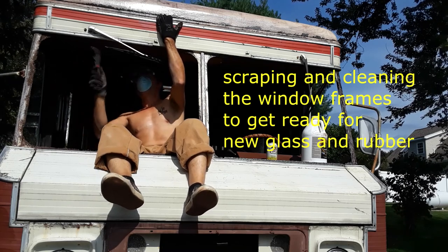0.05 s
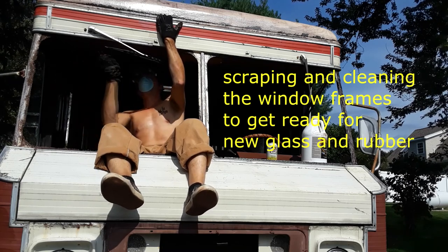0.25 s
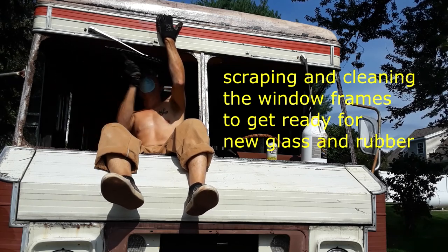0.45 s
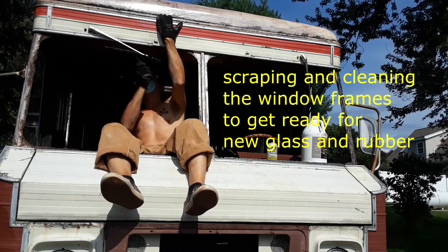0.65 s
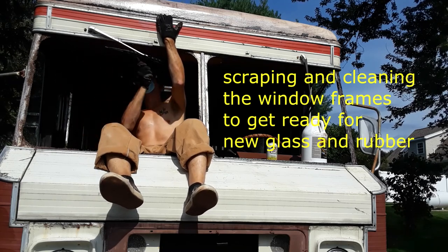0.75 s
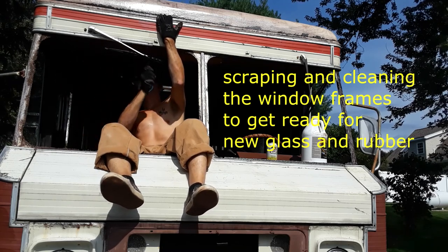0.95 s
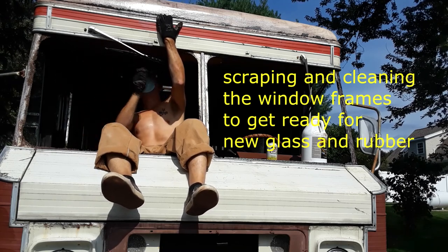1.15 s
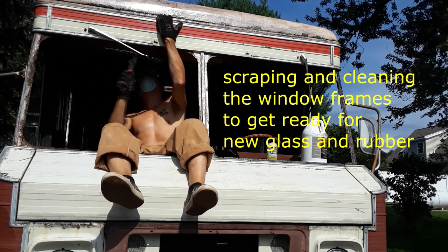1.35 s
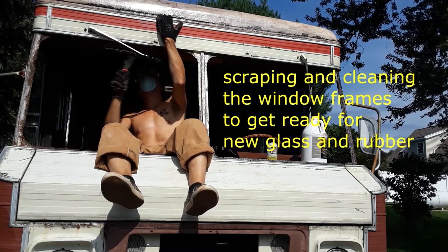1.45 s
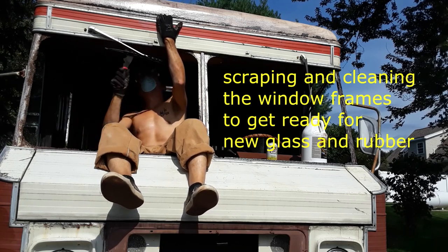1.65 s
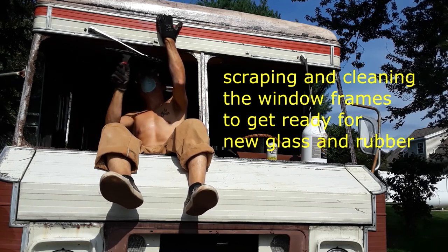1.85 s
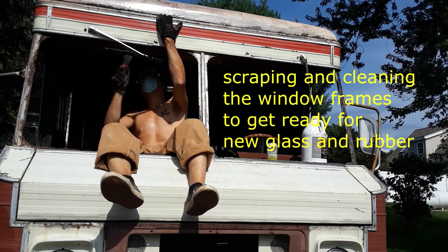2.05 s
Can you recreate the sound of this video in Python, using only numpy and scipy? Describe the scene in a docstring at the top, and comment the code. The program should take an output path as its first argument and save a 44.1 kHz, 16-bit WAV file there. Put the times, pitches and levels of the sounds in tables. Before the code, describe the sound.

Rough metal scraping comes in three short bursts as a blade catches on a camper window frame. After a pause, one knock rings the panels. The microphone is a few metres away outdoors, with faint hum and breeze.

```python
"""A steel scraper is pushed three times along an old camper's window frame, then knocks against it once.
The blade sticks, slips and judders, catching on old sealant. These tiny jolts make the blade hiss,
the frame rattle and the sheet panels boom into the cab. We hear it outdoors, a few metres away and
a little to the left, over a faint low hum, a hiss and a light breeze."""
import sys
import numpy as np
from scipy import signal
from scipy.fft import rfft, irfft
from scipy.io import wavfile

SR = 44100
rng = np.random.default_rng(int(sys.argv[2]) if len(sys.argv) > 2 else 0)


def wav_record(signal):
    """Record a signal, one row per channel, as 16-bit PCM in the file named by sys.argv[1]."""
    frames = np.transpose(np.atleast_2d(signal))
    bounded = np.clip(frames, -1, 1)
    # unit amplitude maps onto the largest positive 16-bit level
    quanta = np.round(bounded * 32767).astype(np.int16)
    wavfile.write(sys.argv[1], SR, quanta)


N = 92610
T = np.arange(N) / SR
FREQS = np.maximum(np.fft.rfftfreq(2 * N, 1 / SR), 1)

# tone of the outdoor air and of the breeze on the microphones: (frequency [Hz], level [dB])
AIR_TONE = [(20, -2), (45, -67), (65, -19), (100, -9.5), (160, -5.5), (230, -9.5), (330, -15), (500, -17.5),
            (1400, -22), (4000, -24), (8200, -24.5), (9400, -32.5), (16000, -31)]
BREEZE_TONE = [(20, -49), (45, -22), (68, 12), (100, -12), (160, -12), (400, -6), (2000, -65)]
# how loud the far hum is: (time [s], level [dB])
HUM_LEVEL = [(0, -53.5), (.2, -55), (.7, -47.5), (1.15, -50), (1.33, -59), (1.48, -53), (1.65, -46.5),
             (1.9, -56), (2.1, -59)]
# how hard each part is pushed, one list per stroke: (time [s], panels [dB], frame [dB], blade [dB])
STROKES = [
    [(.230, -22, -40, -27), (.255, -30, -23, -53), (.275, -24, -25.5, -30), (.31, -28, -23.5, -28),
     (.335, -17.5, -15.5, -23), (.352, -28, -17, -27), (.368, -39, -16, -16), (.392, -21, -17.5, -22.5),
     (.405, -29.5, -28.5, -54), (.435, -27, -21, -32), (.465, -58, -51, -36.5), (.49, -53, -46, -38)],
    [(.495, -31, -19, -20), (.515, -33, -27, -30), (.535, -39, -24.5, -35), (.555, -47, -28, -34),
     (.567, -28.5, -24.5, -39), (.595, -28, -30.5, -32), (.612, -31, -23.5, -32.5), (.628, -34, -38, -59)],
    [(.74, -61, -47, -57), (.775, -54, -50.5, -57), (.835, -68, -49, -64), (.857, -34, -29, -39),
     (.863, -29, -21, -24.5), (.873, -30.5, -33, -42), (.895, -28, -20.5, -24.5), (.912, -27.5, -22.5, -25),
     (.935, -27.5, -27.5, -28), (.952, -27, -33, -35.5), (.98, -36, -53, -45)],
]
# the blade catches and snaps free: (time [s], panels [dB], frame [dB], blade [dB])
CATCHES = [(.2298, -18.5, -17.5, -18), (.2655, -41, -30, -40), (.326, -24, -20, -24.5),
           (.3655, -15.5, -18, -18.5), (.3865, -41, -20, -18), (.3935, -41, -13.5, -27),
           (.4170, -24, -18.5, -15.5), (.4235, -29, -16.5, -19), (.4490, -26, -19, -17),
           (.4962, -30, -18, -24), (.5098, -38, -41, -16.5), (.529, -49, -22.5, -22),
           (.585, -43, -15, -28.5), (.8423, -26, -27, -21), (.8781, -22, -12.5, -11),
           (.9125, -20, -20.5, -28)]
# notes the panels and frame ring at: (frequency [Hz], ring time [s], scraped [dB], knocked [dB])
PANEL_NOTES = [(165.6, 0.38, -20.5, -17), (214.3, 0.29, -19.5, -20.5), (252.3, 0.28, -17.5, -40),
               (311.4, 0.58, -20, -34), (353.7, 0.49, -17.5, -27), (411.6, 0.2, -10.5, -10),
               (502, 0.31, -18.5, -17.5), (524.5, 0.26, -21, -15.5), (586, 0.29, -36, -21)]
FRAME_NOTES = [(704, 0.2, -20.5, -13), (813, 0.05, -22.5, -11), (872.5, 0.21, -19.5, -30),
               (979.6, 0.1, -16.5, -8), (1037, 0.072, -14, -43), (1163, 0.083, -15.5, -27.5),
               (1343, 0.081, -19, -20.5), (1673, .14, -20.5, -38), (1910, 0.05, -16, -25),
               (2108, 0.055, -18, -12)]
# notes the blade rings at: (frequency [Hz], ring time [s], level [dB])
BLADE_NOTES = [(10400, 0.014, -29.5), (12800, 0.0078, -14)]
# overall tone of each part and of the knock's thud: (frequency [Hz], level [dB])
PANEL_TONE = [(40, -42), (100, -14), (170, -1), (260, -1.5), (420, 3), (520, -3), (640, -8.5), (850, -16),
              (2000, -44), (16000, -70)]
FRAME_TONE = [(100, -37), (450, -11.5), (720, -5), (1050, 0), (1650, -1.5), (2100, -7), (2900, -10.5),
              (4000, -22.5), (6000, -22.5), (16000, -47.5)]
BLADE_TONE = [(100, -39), (1500, 2.5), (3000, 3.5), (4300, -0.5), (5500, -0.5), (7000, -2), (9000, -3.5),
              (11000, -3.5), (12700, 1.5), (14300, -7), (16000, -2.5)]
THUD_TONE = [(30, -53), (90, -23), (130, -24), (175, -13.5), (260, -2), (480, 4.5), (1150, -3), (1400, 0.5),
             (1800, -9), (2120, -6.5), (2450, -18.5), (3100, -15), (6000, -26), (16000, -41)]
# bursts of almost even slipping: (middle time [s], length [s], slip rate [1/s], level [dB])
JUDDERS = [(0.275, 0.031, 1060, -27), (.314, 0.026, 1070, -23), (.338, .025, 1680, -15.5),
           (.385, .035, 1700, -19), (.452, 0.0097, 2700, -17.5), (.570, .03, 980, -27),
           (.625, .05, 515, -37.5), (0.8444, .005, 2060, -16)]
# notes left ringing as the last stroke flicks free: (frequency [Hz], ring time [s], level [dB])
FLICK_NOTES = [(410, .28, -15.5), (445, .2, -26), (1034, .18, -31), (2778, .25, -37), (5577, .6, -30),
               (12550, .2, -33)]
# the blade touches, lands on the frame and settles: (time [s], thud [dB], blade [dB])
KNOCKS = [(1.7470, -28, -19.5), (1.7495, -47, -20.5), (1.7513, -6.5, -22), (1.7548, -13.5, -26),
          (1.849, -35.5, -42)]
# how much louder the left microphone is than the shaded right one: (frequency [Hz], level [dB])
LEFT_LEAD = [(100, -2.5), (600, 1), (1150, -2.5), (2000, -2.5), (4500, 1.5), (6800, -5), (8000, 1.5),
             (9500, 7.5), (12800, 11), (14000, 5), (16000, -7)]


def undb(db):
    """Turn decibels into a number to multiply by."""
    return 10 ** (np.asarray(db) / 20)


def unit(x):
    """Scale a sound so that its channels have an average energy of one."""
    return x / np.sqrt(np.mean(np.sum(x ** 2, axis=-1)))


def db_at(points):
    """Join (frequency [Hz], level [dB]) points into a curve over all frequencies."""
    hz, db = np.array(points, float).T
    return np.interp(np.log(FREQS), np.log(hz), db)


def filtered(x, gain):
    """Turn each frequency up or down by its own gain."""
    return irfft(rfft(x, 2 * N) * gain)[..., :N]


def with_tone(x, points):
    """Give a sound a tone curve, using a filter that never rings ahead of the sound."""
    cepstrum = irfft(np.log(undb(db_at(points))))
    one_sided = np.r_[cepstrum[0], 2 * cepstrum[1:N]]
    return filtered(x, np.exp(rfft(one_sided, 2 * N)))


def fade(ring_s):
    """A dying ring: 60 dB quieter after its ring time, ring_s."""
    return np.exp(-np.log(1000) * T / max(ring_s, 1 / SR))


def taps(table, column):
    """One sharp tap per row, with the energy of 4 ms of sound at that row's level."""
    out = np.zeros(N)
    for row in table:
        out[int(row[0] * SR)] += undb(row[column]) * np.sqrt(.004 * SR)
    return out


def two_mics(pair, alike_hz):
    """Mix two unrelated sounds for two microphones: alike in the bass, unrelated in the treble."""
    alike = 1 / (1 + (FREQS / alike_hz) ** 2)
    mid, side = filtered(pair, np.sqrt([(1 + alike) / 2, (1 - alike) / 2]))
    return np.array([mid + side, mid - side])


def ring_notes(force, notes, knocked=False):
    """A pushed part rings at its own notes, each dying away at its own speed."""
    response = np.zeros(N)
    for k, row in enumerate(notes):
        hz, ring_s, db = row[0], row[1], row[-1] if knocked else row[2]
        note = unit(fade(ring_s) * np.cos(2 * np.pi * hz * T))
        response += (-1) ** k * undb(db) * note
    return filtered(force, rfft(response, 2 * N))


def clatter(force, tone, ring_s, cab_ring_s, direct_db, cab_db):
    """A direct crack, a short noisy ring and the cab's echo; the ring changes as the blade travels."""
    spot_samples, ring_samples = 1764, 16384  # the blade spends 40 ms on each spot
    decay = np.hypot(unit(fade(ring_s)), undb(cab_db) * unit(fade(cab_ring_s)))[:ring_samples]
    ring = np.zeros((2, N + spot_samples + ring_samples))
    for start in range(0, N, spot_samples):
        push = force[None, start:start + spot_samples]
        noise = rng.standard_normal((2, ring_samples))
        if push.any():
            spot_ring = signal.fftconvolve(push, noise * decay, axes=1)
            ring[:, start:start + spot_ring.shape[1]] += spot_ring
    total = undb(direct_db) * force + two_mics(ring[:, :N], alike_hz=1490)
    total /= np.sqrt(1 + undb(direct_db) ** 2 + undb(cab_db) ** 2)
    tone_response = unit(with_tone(T == 0, tone))
    return filtered(total, rfft(tone_response, 2 * N))


def background(air_db=-45.5, breeze_db=-55.5, hum_hz=127.4, waver_hz=4.9):
    """Steady outdoor rumble and hiss, a breeze on the microphones and a hum like a far engine."""
    air_noise = two_mics(rng.standard_normal((2, N)), alike_hz=417)
    air = unit(with_tone(air_noise, AIR_TONE))
    breeze = unit(with_tone(rng.standard_normal((2, N)), BREEZE_TONE))
    slow_only = 1 / (1 + (FREQS / 6) ** 4)
    waver = np.sqrt(N) * unit(filtered(rng.standard_normal(N), slow_only))
    hum = unit(np.sin(2 * np.pi * np.cumsum(hum_hz + waver_hz * waver) / SR))
    hum_db = np.interp(T, *np.array(HUM_LEVEL).T)
    return np.sqrt(N) * (undb(air_db) * air + undb(breeze_db) * breeze + undb(hum_db) * hum)


def stick_slip(slips_per_s=650, gap_spread=.6, size_spread_db=3, rub_gain=.39):
    """The blade grips and lets go: jolts of uneven size and spacing, over a smoother rub."""
    gap, size = rng.standard_normal((4000, 2)).T
    at = (np.cumsum(np.exp(gap_spread * gap)) / slips_per_s * SR).astype(int)
    slips = np.bincount(at[at < N], undb(size_spread_db * size[at < N]), N)
    force = (slips - slips.mean()) / slips.std() + rub_gain * rng.standard_normal(N)
    return force / force.std()


def scrape(friction, column):
    """The force on one part: friction grows with each stroke's pressure, and catches add jolts."""
    pressure = np.zeros(N)
    for stroke in map(np.array, STROKES):
        pressure += np.interp(T, stroke[:, 0], undb(stroke[:, column]), left=0, right=0)
    return friction * pressure + taps(CATCHES, column)


def panel_boom(force):
    """The wide sheet panels shake at low notes and boom into the cab."""
    boom = clatter(force, PANEL_TONE, ring_s=.07, cab_ring_s=.37, direct_db=-3, cab_db=4)
    return undb(-3) * boom + ring_notes(force, PANEL_NOTES)


def frame_rattle(force):
    """The window frame rattles at higher, shorter notes than the panels."""
    rattle = clatter(force, FRAME_TONE, ring_s=.045, cab_ring_s=.27, direct_db=-9.5, cab_db=-3.5)
    return undb(-4) * rattle + ring_notes(force, FRAME_NOTES)


def blade_hiss(force):
    """The steel blade hisses and rings very briefly, high in the treble."""
    hiss = clatter(force, BLADE_TONE, ring_s=.034, cab_ring_s=.15, direct_db=-4, cab_db=-8)
    return undb(-3.33) * hiss + ring_notes(force, BLADE_NOTES)


def judder(gap_spread=.04):
    """The blade slips almost evenly, shaking the frame in short bursts that swell and fade."""
    force = np.zeros(N)
    for middle_s, length_s, rate, db in JUDDERS:
        t = np.cumsum(1 + gap_spread * rng.standard_normal(128)) / rate
        t = t[t < length_s]
        at = ((middle_s - length_s / 2 + t) * SR).astype(int)
        swell = np.sin(np.pi * t / length_s)
        force[at] += undb(db) * np.sqrt(SR / rate) * swell
    return force


def flick(time_s=.912):
    """The last stroke flicks free, leaving a panel and the blade ringing."""
    return ring_notes(taps([(time_s, 0)], column=1), FLICK_NOTES)


def knock():
    """The scraper lands on the frame with a thud that rings both frame and panels."""
    force = taps(KNOCKS, column=1)
    thud = clatter(force, THUD_TONE, ring_s=.011, cab_ring_s=.2, direct_db=-8, cab_db=-3)
    return undb(-2.1) * thud + ring_notes(force, PANEL_NOTES + FRAME_NOTES, knocked=True)


def from_left(x, lag_s=.000096):
    """The work is left of centre, so the right microphone hears it later and shaded."""
    lead = undb(db_at(LEFT_LEAD) / 2)
    delay = np.exp(-2j * np.pi * FREQS * lag_s)
    return filtered(x, np.array([lead, delay / lead]))


def scene():
    """One friction shakes panels, frame and blade; the flick and knock follow, over the background."""
    friction = stick_slip()
    panel_force = scrape(friction, column=1)
    frame_force = scrape(friction, column=2) + judder()
    blade_force = scrape(friction, column=3) + taps(KNOCKS, column=2)
    parts = panel_boom(panel_force) + frame_rattle(frame_force) + blade_hiss(blade_force)
    return from_left(parts + flick() + knock()) + background()


def record(dry):
    """Cut away the very highest treble."""
    top_hz = 15700
    return signal.sosfilt(signal.ellip(10, .2, 70, top_hz, fs=SR, output="sos"), dry)


dry = scene()
out = record(dry)
wav_record(out)
```